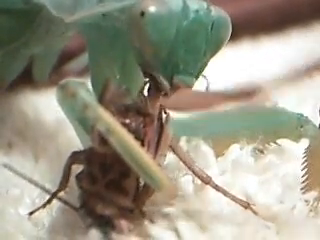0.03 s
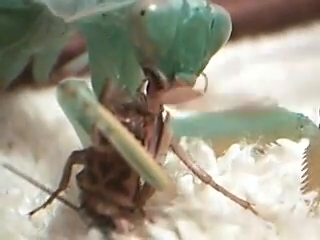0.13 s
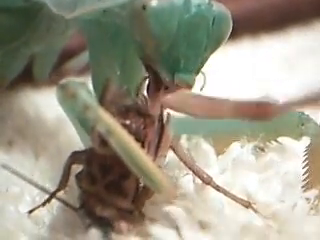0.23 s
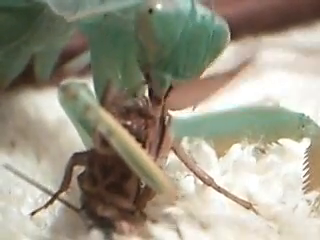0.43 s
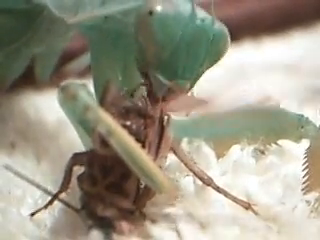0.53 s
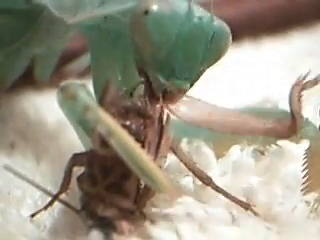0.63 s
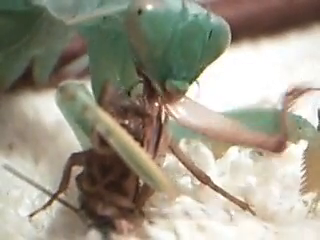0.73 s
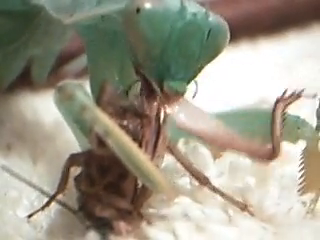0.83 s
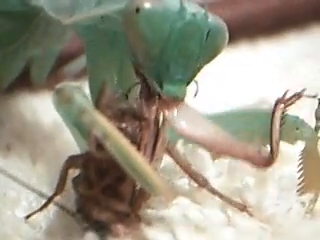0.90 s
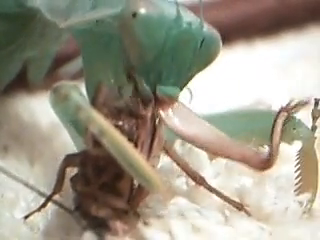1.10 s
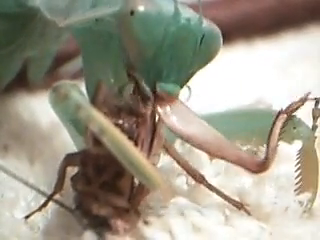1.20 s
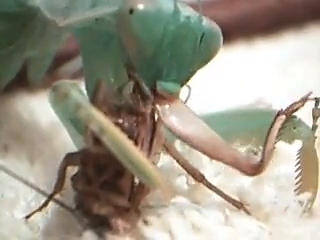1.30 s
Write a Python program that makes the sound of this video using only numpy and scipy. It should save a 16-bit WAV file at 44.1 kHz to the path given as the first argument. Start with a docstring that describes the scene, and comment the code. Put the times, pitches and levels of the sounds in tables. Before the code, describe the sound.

A mantis chews a cricket very close to the microphone, cracking the shell in tiny, sharp bursts. A light tick at 0.15 seconds leads to a crack at 0.2 and the loudest crunch around 0.35. Soft ticks follow near 0.85, then another sharp crack at 1.0. Light knocks briefly ring the hard surface with the cracks. Faint hiss and a thin, motor-like whine run throughout.

```python
"""On a hard support, right by a small microphone, a mantis chews a cricket. Its jaws crack the shell
in short bursts: each crack is a rapid run of slips and grit that rings the shell's short-lived modes,
and the loudest overload the input. Soft jolts set the support ringing on after the cracks.
Faint hiss and thin, motor-like tones lie below."""
import sys
import numpy as np
from scipy import signal
from scipy.io import wavfile

SR = 44100
rng = np.random.default_rng(int(sys.argv[2]) if len(sys.argv) > 2 else 0)


def pcm_store(signal):
    """Save signal as 16-bit PCM."""
    levels = np.round(np.clip(np.atleast_2d(signal), -1, 1) * 32767)
    wavfile.write(sys.argv[1], SR, levels.astype(np.int16).T)


N = 59535


def from_db(db):
    """Decibels to amplitude."""
    return 10 ** (np.asarray(db) / 20)


def rms_one(x):
    """Scale to an rms of 1."""
    return x / np.sqrt(np.mean(x ** 2) + 1e-20)


def butter(x, order, hz, kind="low"):
    """Butterworth filter."""
    return signal.sosfilt(signal.butter(order, hz, kind, fs=SR, output="sos"), x)


def drift(rate_hz):
    """Smooth random wander with a spread of 1."""
    pole = np.exp(-80 * np.pi * rate_hz / SR)   # one step every 40 samples
    slow = signal.lfilter([1], [1, -2 * pole, pole * pole], rng.standard_normal(N // 40 + 2002))[2000:]
    return np.interp(np.arange(N) / 40, np.arange(len(slow)), rms_one(slow - slow.mean()))


def ring(clicks, hz, db, t60):
    """One mode: each click sets a decaying sine ringing."""
    r, w = from_db(-60 / (t60 * SR)), 2 * np.pi * hz / SR
    return signal.lfilter([0, from_db(db) * np.sin(w)], [1, -2 * r * np.cos(w), r * r], clicks + 1e-18)


def hiss(rms_db=-44.5, flicker_db=1.0, flicker_hz=30.0, top_hz=10670):
    """A faint bed of noise in third-octave bands, each flickering a little."""
    # colour of the hiss: (frequency [Hz], relative level [dB])
    colour = [(25, -31), (60, -24), (140, -20.5), (300, -17.5), (550, -13), (900, -17.5), (1800, -16.5),
              (2400, -14), (2900, -22.5), (3800, -27.5), (6500, -24.5), (8000, -26.5), (9200, -29),
              (10500, -24.5)]
    colour_hz, colour_db = np.transpose(colour)
    edges = 20 * 2 ** np.arange(0, 9.4, 1 / 3)
    white = rng.standard_normal((2, N + SR))
    out = 0
    for k, (low, high) in enumerate(zip(edges, edges[1:])):
        band = butter(white[k % 2], 2, [low, high], "band")[SR:]
        band_db = np.interp(np.log(low * high) / 2, np.log(colour_hz), colour_db)
        out += from_db(band_db + flicker_db * drift(flicker_hz)) * band
    return from_db(rms_db) * rms_one(butter(out, 16, top_hz))


def thin_tones(wander_hz=1.44, waver_rate_hz=18.4):
    """A thin, motor-like whine: held sines that waver in level and pitch."""
    # tones of the whine: (pitch [Hz], rms level [dB], waver [dB])
    partials = [(287, -65, 7.5), (719.6, -50, 1), (871, -59.5, 5), (1620, -62, 5), (2450, -57, -1.5),
                (2557, -52, 2.5), (2745, -66, 6.5), (2975, -68, -5)]
    out = 0
    for hz, db, waver_db in partials:
        peak = np.sqrt(2) * from_db(db + waver_db * drift(waver_rate_hz))
        cycles = rng.random() + np.cumsum(hz + wander_hz * drift(waver_rate_hz)) / SR
        out += peak * np.sin(2 * np.pi * cycles)
    return out


def support_ring(top_hz=3900):
    """Soft jolts ring the hard support under the prey: a low knock with a high, lingering tail."""
    # modes of the support: (frequency [Hz], t60 [s])
    modes = [(45, .016), (130, .035), (260, .016), (440, .012), (1150, .008), (1770, .03), (2145, .05),
             (2370, .18), (2772, .15), (2885, .1)]
    # when each jolt lands: (time [s])
    jolt_s = [.1475, .2263, .3361, .3420, .8395, .8592, 1.0078]
    # strength of the jolts, a row per jolt and a column per mode: (level [dB])
    jolt_db = [(-80, -41, -64.5, -34, -46, -27.5, -62, -64, -58, -65),
               (-15.5, -53, -45, -15, -26, -3.5, -10.5, -33.5, -22, -44),
               (-5.5, -28, -19, -22.5, -7, -20, -51, -35, -44, -48),
               (-25, -46, -25, -8, -42, -16, -37, -27, -37, -44),
               (-80, -34, -65, -37, -57, -40, -46, -35, -52, -56),
               (-70, -28.5, -38.5, -25.5, -49, -25, -55, -34, -40, -52),
               (-58, -24.5, -23, -10.5, -37, -10.5, -26, -25, -25.5, -23)]
    onsets = (np.array(jolt_s) * SR).astype(int)
    out = 0
    for (hz, t60), levels_db in zip(modes, np.transpose(jolt_db)):
        jolts = np.zeros(N)
        jolts[onsets] = -from_db(levels_db)
        out += butter(ring(jolts, hz, 0, t60), 2, (hz - 35) / 2, "high")   # thin out below the mode
    return butter(out, 4, top_hz)


def jaw_slips(rise_s, length_s, fade_db, slip_hz, uneven, grit_db=-10.5, spread_db=4, first_slip_db=5):
    """The clicks of one crack: the jaw slips hard once, then at a near-regular rate, with grit between."""
    size = SR // 25
    t = np.arange(size) / SR
    gap_jitter, force_jitter = rng.standard_normal((2, 200))
    grit = rng.standard_normal(size) ** 3 / 4   # cubing makes the noise spiky
    clicks = from_db(grit_db) * uneven * grit
    slip_at = np.cumsum(np.exp(uneven * gap_jitter / 2)) * SR / slip_hz
    slip_at = (slip_at - slip_at[0]).astype(int)
    force = from_db(spread_db * uneven * np.clip(force_jitter, -2, 1.5))
    inside = slip_at < size
    clicks[slip_at[inside]] -= force[inside]
    clicks[0] *= from_db(first_slip_db)
    attack = np.clip((t + 4 / SR) / rise_s, 0, 1)
    fade = from_db(fade_db * t / length_s)
    release = np.clip((length_s - t) * SR / 8, 0, 1)
    return clicks * attack * fade * release


def shell_cracks(main_t60_s=0.0038, dull_hz=3650, low_hz=1303, stop_hz=8540):
    """The crunch: jaw slips ring the shell's main mode at the slip rate, plus body and bright modes."""
    # broad shell modes around the main one: (frequency [Hz], level [dB], t60 [s])
    body_modes = [(2050, -11.5, 0.0017), (3282, 1, 0.0037)]
    # upper shell modes: (frequency [Hz], level [dB], t60 [s])
    bright_modes = [(4390, -12, 0.0091), (5095, -10, 0.0044), (6900, -20, 0.0032)]
    # cue sheet of the cracks, one entry per crack in each list
    starts = [.1443, .1520, .1701, .2220, .2259, .2880, .3356, .3391, .3405, .3444, .3514, .3641, .8186,
              .8387, .8586, .9517, 1.0072, 1.0093, 1.0131]   # (time [s])
    levels = [-20, -29, -30.5, -38, -6.5, -40.5, -2.5, -18.5, -4.5, -10.5, -12.5, -24, -29.5, -27.5, -18.5,
              -39, -7.5, -8.5, -16.5]   # (drive level [dB])
    brightness = [-2.5, -12, 1, -17, 2, -12, -2.5, 18, 2.5, 4, 4.5, 8, 2, -1, 1, -10, 0, 4, -4]   # (gain of the upper modes [dB])
    rises = [.004, .0003, .0003, .0003, .0002, .001, .0002, .0002, .0003, .0003, .0003, .0003, .0005, .001,
             .0002, .001, .0004, .0003, .0003]   # (attack [s])
    lengths = [.0053, .003, .0015, .002, .0023, .004, .0033, .0014, .0036, .007, .0122, .0036, .002, .0045,
               .005, .004, .002, .0032, .0011]   # (length [s])
    fades = [2, -7, -7, 1, -1, 8.5, 1, 2, -1.5, -3, -13.5, 4, -4.5, -2, -8.5, 1, 3.5, -1, 7]   # (level change over the length [dB])
    slip_rates = [2527, 2220, 2840, 2340, 2946, 2240, 2353, 2535, 2493, 2526, 2716, 3010, 2600, 2594, 2600,
                  2610, 2712, 2400, 2600]   # (slip rate [Hz])
    unevenness = [0.3, 0.9, .4, 0.3, 0.34, 0.35, 0.24, 0.68, .25, .6, 0.31, 0.21, 0.21, 0.27, 0.183, 0.39,
                  0.0815, .6, .3]   # (unevenness [0-1])
    cracks = zip(starts, levels, brightness, rises, lengths, fades, slip_rates, unevenness)
    out = np.zeros(N + SR)
    for start_s, db, bright_db, rise_s, length_s, fade_db, slip_hz, uneven in cracks:
        clicks = from_db(db) * jaw_slips(rise_s, length_s, fade_db, slip_hz, uneven)
        main = ring(clicks, slip_hz, 0, main_t60_s)
        body = sum(ring(clicks, *mode) for mode in body_modes)
        snap = from_db(bright_db) * sum(ring(clicks, *mode) for mode in bright_modes)
        onset = int(start_s * SR)
        out[onset:onset + len(clicks)] += butter(main + body, 2, dull_hz) + snap
    crunch = butter(out[:N] + 1e-18, 3, low_hz, "high")
    return signal.sosfilt(signal.cheby2(8, 40, stop_hz, fs=SR, output="sos"), crunch)


def scene():
    """Mono mix: crunch and ringing support over the quiet bed."""
    return (shell_cracks() + support_ring() + hiss() + thin_tones())[None]


def record(dry):
    """The input overloads on the loudest cracks, shelves the treble, cuts the top and adds an offset."""
    ceiling, hardness, dc_offset = 0.735, 14, -0.0095
    shelf_hz, shelf_floor, stop_hz = 6150, from_db(-34), 16800
    clipped = dry / (1 + np.abs(dry / ceiling) ** hardness) ** (1 / hardness)
    shelved = shelf_floor * clipped + (1 - shelf_floor) * butter(clipped, 1, shelf_hz)
    return signal.sosfilt(signal.cheby2(12, 60, stop_hz, fs=SR, output="sos"), shelved) + dc_offset


dry = scene()
out = record(dry)
pcm_store(out)
```